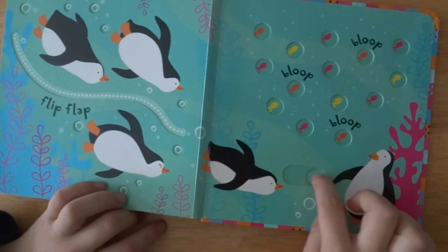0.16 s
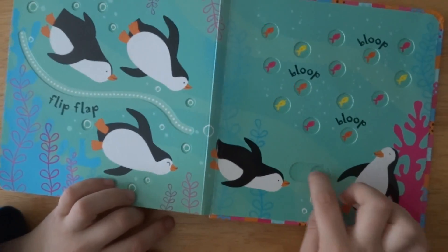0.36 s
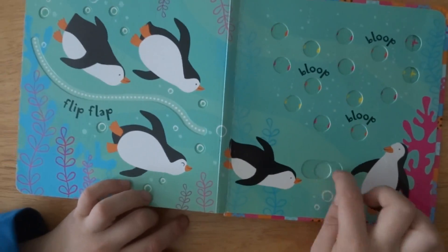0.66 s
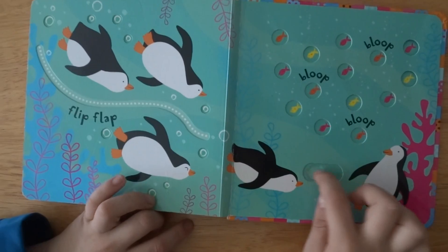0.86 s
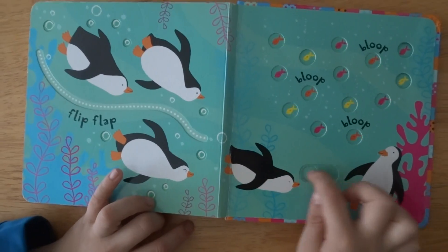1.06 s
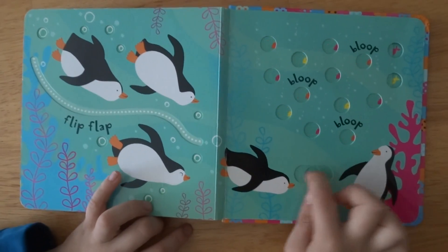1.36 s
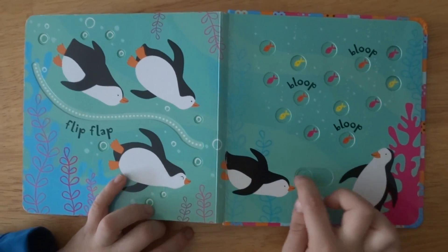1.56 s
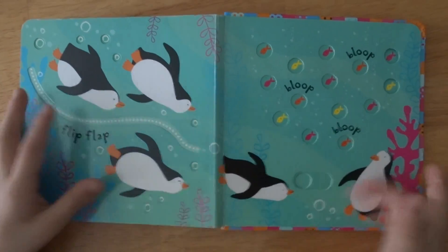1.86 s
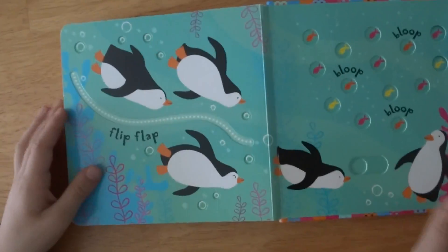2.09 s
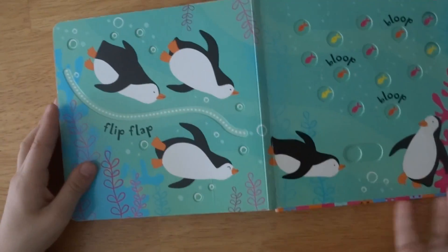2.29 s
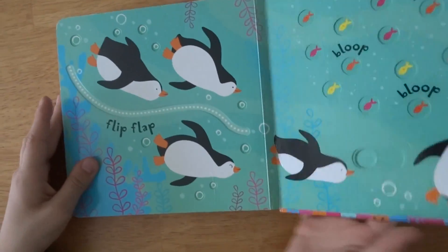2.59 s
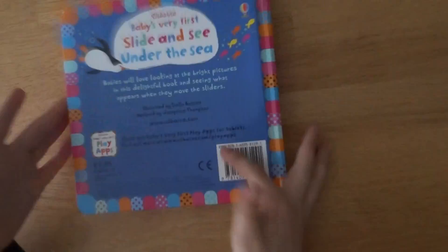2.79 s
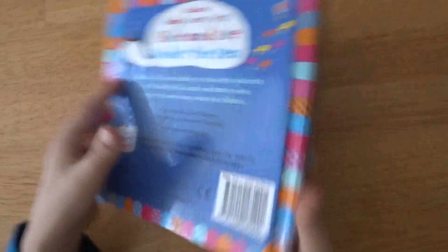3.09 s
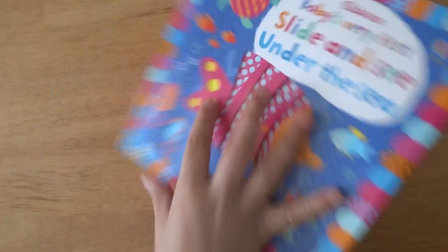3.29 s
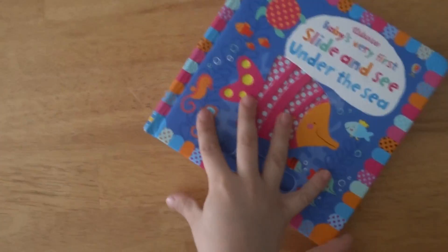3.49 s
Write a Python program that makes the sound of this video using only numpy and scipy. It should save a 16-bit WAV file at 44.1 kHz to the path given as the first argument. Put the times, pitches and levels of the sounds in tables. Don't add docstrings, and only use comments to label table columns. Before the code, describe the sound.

A board book's slider ticks softly, then the book is slapped shut, flipped and dragged across wood

```python
import sys
import numpy as np
from scipy import signal
from scipy.fft import rfft, irfft, next_fast_len
from scipy.io import wavfile
from scipy.ndimage import uniform_filter1d

SR = 44100
rng = np.random.default_rng(int(sys.argv[2]) if len(sys.argv) > 2 else 0)


def rack_gain(trim_db):
    fader = np.asarray(trim_db, float)
    return 10 ** (fader / 20)


def master(y):
    cut = np.clip(np.atleast_2d(y).T, -1, 1)
    pcm = np.round(cut * 32767)
    wavfile.write(sys.argv[1], SR, pcm.astype(np.int16))


N = 160965


def evened(x):
    return x / np.sqrt(np.mean(x ** 2) + 1e-20)


def colour(x, points):
    x = np.concatenate([x, x[..., ::-1]], axis=-1)
    hz, db = np.transpose(points)
    size = next_fast_len(x.shape[-1])
    log_hz = np.log(np.fft.rfftfreq(size, 1 / SR) + 1)
    gain = rack_gain(np.interp(log_hz, np.log(hz + 1), db))
    return irfft(rfft(x, size) * gain, size)[..., :N]


def add(mix, s, sound):
    part = mix[round(s * SR):][:len(sound)]
    part += sound[:len(part)]


def ring(hz, db, t60, rise, sign=1):
    t60 = t60 * np.ones(len(hz))
    t = np.arange(0, t60.max(), 1 / SR)
    strength = np.sign(sign) * rack_gain(db)
    decay = rack_gain(-60 * t / t60[:, None])
    modes = strength[:, None] * np.sin(2 * np.pi * hz[:, None] * t) * decay
    x = modes.sum(0) * np.minimum(t / rise, 1)
    return x / abs(x).max()


def cluster(luck, hz, spread, t60, rise):
    off = np.linspace(-2.2, 2.6, luck.shape[1]) + 0.06 * luck[0]
    mode_db = luck[1] - 3.5 * off ** 2
    return ring(hz * np.exp(spread * off), mode_db, t60, rise, luck[0] + luck[1])


# frequency in Hz, level in dB.
AIR_COLOUR = [(15, -61), (25, -49), (137, 1), (236, -5), (317, -11), (641, -13.5), (734, -24.5),
              (7710, -37.5), (16000, -56)]
# frequency in Hz, width in Hz, level in dB.
HUM_MODES = [(52.6, 19, -66), (107.4, 29, -64.5), (219, 59, -68), (458, 42, -75)]
# frequency in Hz, side minus mid in dB.
AIR_SIDE = [(60, -31), (240, -14), (950, -2), (3770, -2), (15000, -16)]
AIR_DB = -64


def floor():
    air = rack_gain(AIR_DB) * evened(colour(rng.standard_normal((2, N)), AIR_COLOUR))
    for hz, width, db in HUM_MODES:
        b, a = signal.iirpeak(hz, hz / width, SR)
        hum = signal.lfilter(b, a, rng.standard_normal((2, N)))
        hum = signal.lfilter(b, a, hum)
        air = air + rack_gain(db) * evened(hum)
    return np.array([air[0], colour(air[1], AIR_SIDE)])


# frequency in Hz, t60 in seconds.
ROOM_T60 = [(100, 0.53), (260, 0.77), (700, 0.46), (1840, 0.42), (4850, 0.39), (10000, 0.33)]
# frequency in Hz, side minus mid in dB.
REVERB_SIDE = [(60, -32), (550, -14), (1650, -11.5), (4970, -16.5), (15000, -41)]
# delay in seconds, level in dB.
NEAR_ECHOES = [(.0019, -37.5), (.009, -18), (.0155, -22.5), (.019, -19.5)]
ROOM_DB, ROOM_RISE_S = -7.5, 0.0063
ROOM_TURN_S = 0.37


def room(x):
    hz, t, z = signal.stft(rng.standard_normal((3, 2, SR)), SR, nperseg=256)
    table_hz, table_t60 = np.transpose(ROOM_T60)
    t60 = np.interp(np.log(hz + 1), np.log(table_hz), table_t60)
    tails = signal.istft(z * rack_gain(-60 * t / t60[:, None]), SR, nperseg=256)[1]
    tails = tails * np.minimum(np.arange(tails.shape[-1]) / SR / ROOM_RISE_S, 1) ** 2
    tails = rack_gain(ROOM_DB) * tails / np.linalg.norm(tails[0, 0])
    wet = np.zeros((2, N))
    for k, tail in enumerate(tails):
        turn = np.arange(N) / SR / ROOM_TURN_S + k / 3
        share = np.sqrt(2 / 3) * abs(np.cos(np.pi * turn))
        wet += signal.fftconvolve((share * x)[None], tail, axes=1)[:, :N]
    for k, (delay, db) in enumerate(NEAR_ECHOES):
        add(wet[0], delay, (-1) ** k * rack_gain(db) * x)
    side = colour(wet[1], REVERB_SIDE) + rack_gain(-34) * x
    return np.array([x + wet[0], side])


def stroke(s, length, db):
    rise_s, fall_s = 0.019, 0.015
    t = np.arange(N) / SR - s
    return rack_gain(db) * np.clip(t / rise_s, 0, 1) * np.exp(-np.maximum(t - length, 0) / fall_s)


# start in seconds, length in seconds, level in dB,
# weight from 0 (light hiss) to 1 (heavy scrape).
RUB_STROKES = [(1.554, 0.25, -67, 0.62), (0.076, 0.036, -75, 0.06), (0.39, 0.088, -59, 0.24),
               (0.603, 0.07, -60, 0.58), (0.753, 0.054, -44.5, 0.63), (0.891, 0.044, -57, 0.62),
               (0.993, 0.046, -49, 0.67), (1.113, 0.04, -51, 0.55), (1.202, 0.048, -45.5, 0.44),
               (1.311, 0.055, -59.5, 0.2), (1.418, 0.04, -45, 0.7), (1.801, 0.04, -62.5, 0.14),
               (1.852, 0.071, -46, 0.41), (1.934, 0.15, -52.5, 0.32), (2.125, 0.25, -57.5, 0.24),
               (2.377, 0.43, -65.5, 0.2), (2.59, 0.31, -63.5, 0.25), (2.703, 0.069, -54.5, 0),
               (2.833, 0.063, -28, 0.8), (2.992, 0.047, -50, 0.46), (3.094, 0.081, -35.5, 0.79),
               (3.19, 0.022, -41, 0), (3.206, 0.022, -47, 0), (3.32, 0.021, -43.5, 0.63)]
# time in seconds, level in dB, weight 0 to 1.
DRAG_JERKS = [
    [(3.354, -10.5, 0.5), (3.364, -25, 0.49), (3.385, -25, 1), (3.4, -20, .9), (3.4045, -39, 1)],
    [(3.408, -21, 0.84), (3.444, -17, 1), (3.468, -23.5, 1), (3.478, -42, 1)],
    [(3.484, -21.5, 1), (3.5, -24, .9), (3.53, -24, 1), (3.556, -36.5, 1), (3.6, -58, 1)],
]
# start in seconds, length in seconds, level in dB.
PAD_STROKE = (0.13, 0.07, -60)
# frequency in Hz, level in dB.
PAD_SPECTRUM = [(1200, -4), (2800, -1.5), (4400, -15), (7200, -0.5), (12000, -26.5)]
LIGHT_SPECTRUM = [(530, -3), (900, -1), (1370, -44), (1630, -7.5), (4180, -5.5), (8050, -0.5),
                  (15500, -31.5)]
HEAVY_SPECTRUM = [(47, -44), (80, -12), (227, -8), (395, -14), (629, -3), (917, -8.5), (6590, -20.5),
                  (8990, -26.5), (16000, -63)]
GRIT_PER_S, GRIT_DB, GRIT_SHARE = 5700, 5.5, 0.55


def rubbing():
    t = np.arange(N) / SR
    light, heavy = np.zeros((2, N))
    for s, length, db, weight in RUB_STROKES:
        shape = stroke(s, length, db)
        light = light + (1 - weight) * shape
        heavy = heavy + weight * shape
    at, db, weight = np.concatenate(DRAG_JERKS).T
    shape = rack_gain(np.interp(t, at, db)) * np.clip((t - at[0]) / 0.011, 0, 1)
    weight = np.interp(t, at, weight)
    light = light + (1 - weight) * shape
    heavy = heavy + weight * shape

    noise = rng.standard_normal((2, N))
    struck = rng.random((2, N)) < GRIT_PER_S / SR
    grain_db = GRIT_DB * np.minimum(rng.exponential(1, (2, N)), 2)
    grit = evened(noise * rack_gain(grain_db) * struck)
    flutter = rack_gain(2.8 * evened(uniform_filter1d(rng.standard_normal((2, N)), 140)))
    grit_share = GRIT_SHARE * np.array([[0.6], [1]])
    rough = flutter * (grit_share * grit + (1 - GRIT_SHARE) * noise[::-1])

    pad = stroke(*PAD_STROKE) * evened(colour(rough[0], PAD_SPECTRUM))
    hiss = light * evened(colour(rough[0], LIGHT_SPECTRUM))
    scrape = heavy * evened(colour(rough[1], HEAVY_SPECTRUM))
    return pad + hiss + scrape


# frequency in Hz, level in dB, t60 in seconds.
TABLE_MODES = [(53, -3.5, 0.17), (117, 6, 0.18), (158.7, 6, .2), (210.6, 6.5, 0.11), (260.7, 2, 0.13),
               (339.6, -1, 0.11), (424, 2.5, .08)]
# time in seconds, blow in dB, contact in seconds,
# hollow-board level in dB re the blow, board pitch in Hz.
TABLE_BLOWS = [(1.628, -57.5, 0.0051, 9.5, 573), (1.773, -40.5, 0.0022, -18, 590),
               (1.84, -37.5, 0.015, -20, 580), (1.898, -37.5, 0.002, -3, 630),
               (2.1502, -38.5, 0.0031, 4.5, 423), (2.157, -34.5, 0.0024, 9.5, 637.5),
               (2.19, -47, 0.001, 9.5, 784), (2.719, -40.5, 0.0011, -4, 610), (2.841, -23, 0.001, -3, 488),
               (2.857, -26.5, 0.0042, 0.5, 694), (2.868, -25.5, 0.0027, 1.5, 555),
               (2.885, -27.5, 0.0022, 4, 620), (3.096, -30, 0.0012, 2, 646),
               (3.121, -24, 0.0031, -8.5, 512), (3.132, -31, 0.0014, 7, 667),
               (3.147, -41.5, 0.0011, 4.5, 536), (3.357, -25, 0.0018, -37, 616),
               (3.408, -16.5, 0.0022, -16, 744), (3.445, -28.5, 0.0017, 4, 635),
               (3.527, -23.5, 0.0017, 5.5, 710), (3.564, -31.5, 0.00088, 0.5, 529)]
BOARD_SPREAD, BOARD_T60 = 0.232, 0.064


def blows():
    out = np.zeros(N)
    hz, mode_db, t60 = np.transpose(TABLE_MODES)
    for s, db, contact, board_db, board_hz in TABLE_BLOWS:
        luck = rng.standard_normal((3, 24))
        table = ring(hz, mode_db + 2 * luck[2, :len(hz)], t60, contact)
        boards = cluster(luck, board_hz, BOARD_SPREAD, BOARD_T60, contact)
        add(out, s, rack_gain(db) * table)
        add(out, s, rack_gain(db + board_db) * boards)
    return out


# time in seconds, knock in dB, tick in dB, knock pitch in Hz.
SLIDER_CLICKS = [(0.023, -58.5, -79, 900), (0.4465, -62, -38, 2900), (0.453, -53, -38, 2670),
                 (0.4605, -65, -37.5, 2470), (0.409, -51, -35, 1170), (0.442, -62, -34.5, 1820),
                 (0.496, -43.5, -58, 1670), (0.621, -44, -59, 1250), (0.75, -36, -31, 1674),
                 (0.765, -54, -50, 2500), (0.9033, -55, -54, 1510), (0.7706, -37, -27.5, 830),
                 (0.794, -26, -47, 1693), (0.911, -36.5, -51, 1404), (1.0027, -62, -52, 1520),
                 (1.0108, -39, -26, 1020), (1.1197, -34.5, -33.5, 1010), (1.035, -26.5, -45, 1960),
                 (1.124, -39.5, -63, 1064), (1.214, -33, -26, 1190), (1.245, -23, -47, 1825),
                 (1.308, -33, -29.5, 990), (1.342, -34, -40, 1510), (1.429, -34, -23.5, 1440),
                 (1.451, -25.5, -49, 1860), (1.625, -57, -76, 1150), (1.65, -43, -43.5, 1065)]
# time in seconds, knock in dB, tick in dB, knock pitch in Hz,
# spread of pitch 0 to 1.
EDGE_SNAPS = [(1.861, -47, -46, 1870, .36), (1.888, -36.5, -28, 2100, 0.29), (1.8987, -42, -57, 1780, 0.5),
              (2.1577, -33, -32, 1597, 0.54), (2.2536, -49, -30, 1740, 0), (2.586, -55, -49.5, 1480, 0.5),
              (2.613, -53.5, -60, 1340, 0), (2.6722, -51, -39, 1980, 0.23), (2.7194, -36, -26, 2900, 0.43),
              (2.738, -49, -43, 1500, 0.34), (2.841, -18.5, -14.5, 1390, 0.54),
              (2.865, -21.5, -29, 1550, 0.05), (3.037, -37, -60, 1078, 0.31),
              (3.072, -39.5, -55, 2580, 0.2), (3.079, -40, -39, 2030, 0.13),
              (3.095, -30.5, -31.5, 1230, 0.34), (3.137, -29, -41, 2440, 0.31),
              (3.148, -23, -26.5, 1700, 0.24), (3.1526, -28.5, -35, 2540, 0.23),
              (3.1668, -39, -12.5, 2500, 0.04), (3.176, -35.5, -18, 5000, 0.06),
              (3.2219, -32, -28, 2310, 0.41), (3.2335, -42, -50, 2120, .2), (3.2474, -32, -45, 2640, 0.6),
              (3.2903, -30.5, -20, 2530, 0.22), (3.356, -16, -14.5, 2025, 0.47),
              (3.3701, -18.5, -17, 3070, 0.37), (3.383, -27, -18.5, 3050, 0), (3.389, -18, -33, 2600, 0.02),
              (3.487, -16, -22, 2950, 0.59), (3.4933, -14, -18, 1630, 0.36), (3.5634, -17, -17.5, 3270, .2),
              (3.6019, -26.5, -29, 3280, 0.21)]
# time in seconds, level in dB, pulse length in seconds.
SHARP_CRACKS = [
    (0.7514, -28, .00006),
    (1.3085, -26, .00008),
    (3.1677, -15, .00003),
    (3.3645, -14, .00005),
    (3.4752, -7, .00007),
]
# frequency in Hz, level in dB.
SLOT_RESONANCES = [(400, -6), (880, 4.5), (1250, -3), (1850, 3.5), (2450, -0.5), (3200, -8), (4600, 8),
                   (6000, -2.5)]
SLIDER_SPREAD = 0.48
KNOCK_DB, KNOCK_T60, CLICK_RISE_S = 5.5, 0.009, 0.0008
TICK_DB, TICK_HZ, TICK_SPREAD, TICK_T60 = -3, 7400, 0.12, 0.007


def clicks():
    slider, snaps = out = np.zeros((2, N))
    for row, table in zip(out, (SLIDER_CLICKS, EDGE_SNAPS)):
        for s, knock_db, tick_db, hz, *own in table:
            knock_luck, tick_luck = rng.standard_normal((2, 2, 20))
            spread = own[0] if own else SLIDER_SPREAD
            knock = cluster(knock_luck, hz, spread, KNOCK_T60, CLICK_RISE_S)
            tick = cluster(tick_luck, TICK_HZ, TICK_SPREAD, TICK_T60, CLICK_RISE_S / 2)
            add(row, s, rack_gain(knock_db + KNOCK_DB) * knock)
            add(row, s, rack_gain(tick_db + TICK_DB) * tick)
    for s, db, length in SHARP_CRACKS:
        u = (np.arange(200) - 40) / SR / length
        pulse = (u ** 2 - 1) * np.exp(-u ** 2 / 2)
        add(snaps, s - 40 / SR, rack_gain(db) * pulse)
    return colour(slider, SLOT_RESONANCES) + snaps


# frequency in Hz,
# side minus mid in dB, a quarter turn off.
PORT_SIDE = [(60, -25), (200, -17.5), (430, -11), (1030, -10), (2500, -11.5), (5250, -21.5), (9560, -19.5),
             (15000, -1)]


def scene():
    mid, side = room(clicks() + blows() + rubbing()) + floor()
    mirrored = np.r_[mid, mid[::-1]]
    quarter_turn = signal.hilbert(mirrored, next_fast_len(2 * N)).imag[:N + 2000]
    side = side - colour(quarter_turn, PORT_SIDE)
    return np.array([mid - side, mid + side])


def roll_off(x):
    return signal.sosfilt(signal.butter(12, 16500, fs=SR, output="sos"), x)


# frequency in Hz, level in dB.
MIC_RESPONSE = [(25, -12), (50, -10.5), (100, -4), (9000, 1), (12000, -1.5), (16000, -4)]


def record(dry):
    limited = np.tanh(colour(dry, MIC_RESPONSE) / 0.77) * 1.072
    return roll_off(limited)


dry = scene()
out = record(dry)
master(out)
```